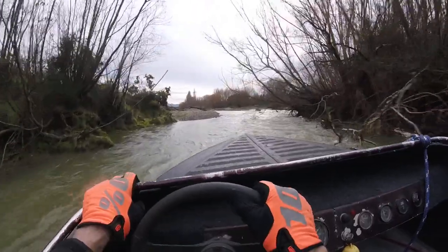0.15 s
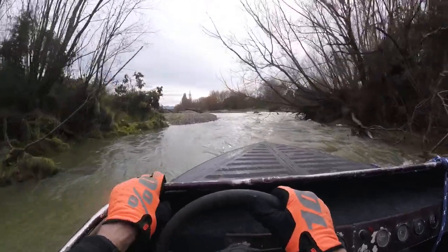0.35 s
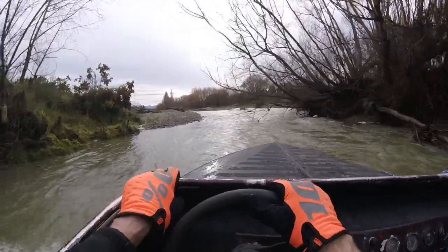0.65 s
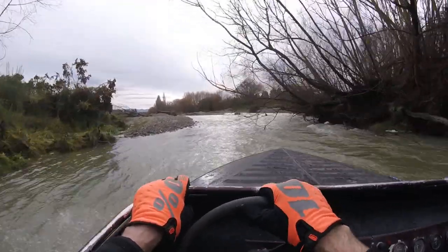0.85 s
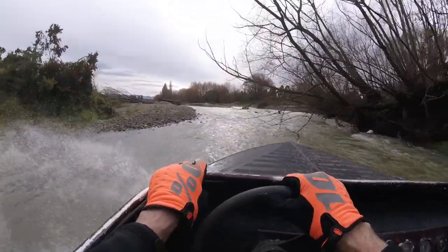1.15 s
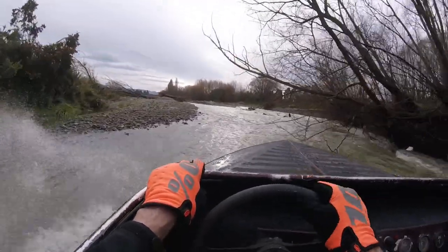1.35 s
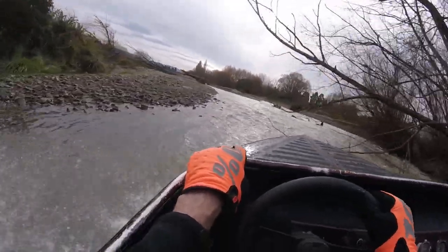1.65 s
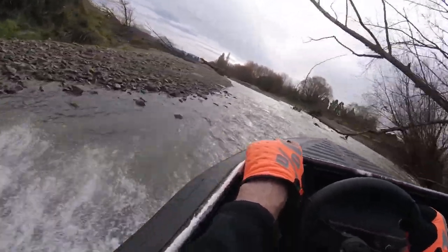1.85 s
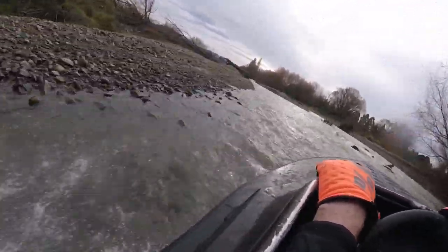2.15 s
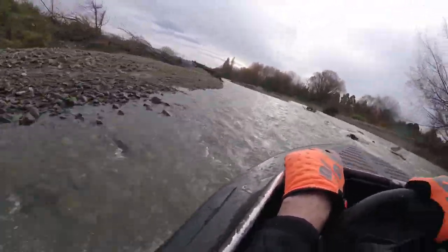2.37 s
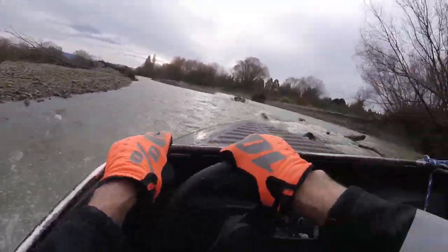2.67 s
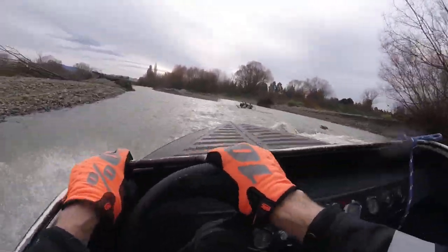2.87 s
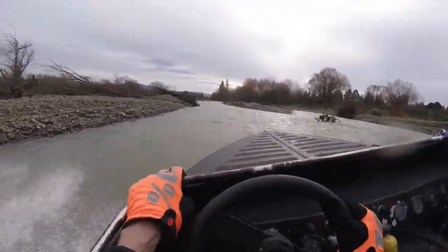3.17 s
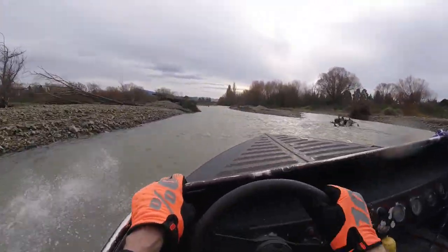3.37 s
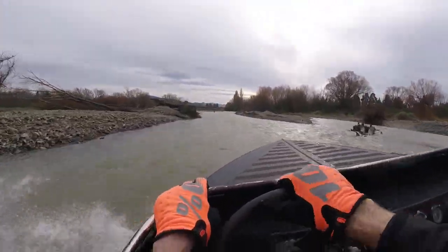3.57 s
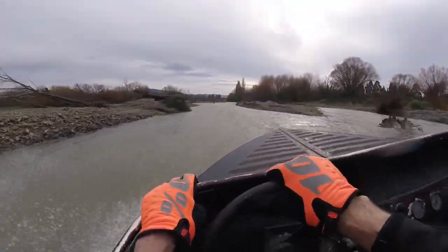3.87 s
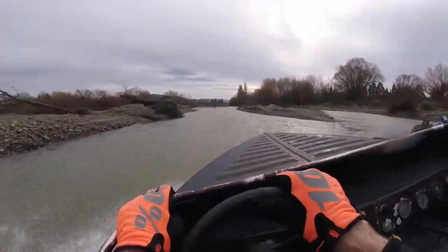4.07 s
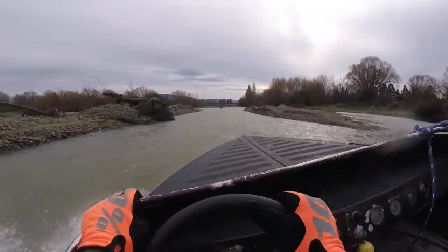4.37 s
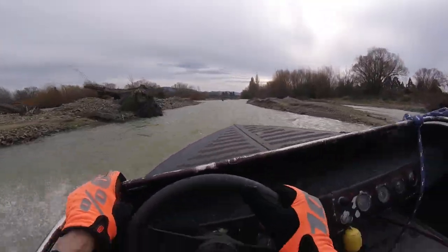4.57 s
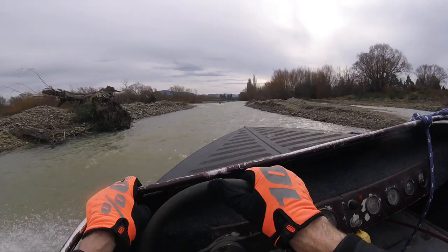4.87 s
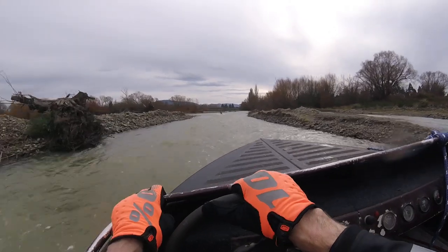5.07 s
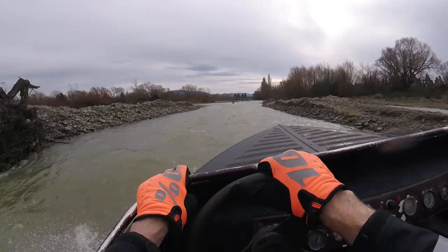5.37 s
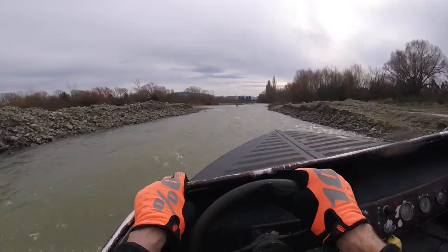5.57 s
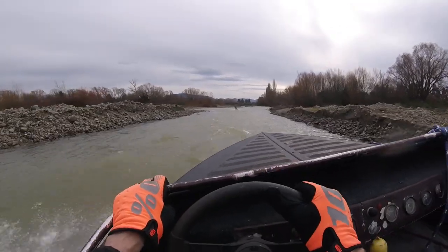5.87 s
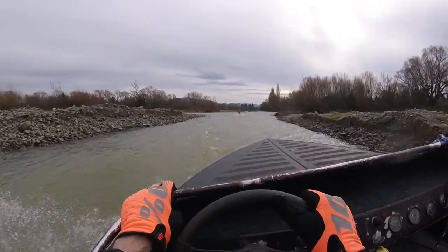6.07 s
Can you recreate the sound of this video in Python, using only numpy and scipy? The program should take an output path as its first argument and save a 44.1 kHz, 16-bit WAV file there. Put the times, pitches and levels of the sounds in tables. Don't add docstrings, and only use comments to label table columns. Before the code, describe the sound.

A helmet microphone in a sealed case, outdoors, about a metre above the deck. A steady high-revving engine growls and drones throughout, with faint valve clatter and high, narrow spray hiss. Early wave blows and a panel rattle give way to thin squeaks, then a splashy skid with a metallic stone knock around two seconds. Afterwards the drone continues over scattered dull thumps and more rattling.

```python
import sys
import numpy as np
from scipy import signal
from scipy.fft import rfft, irfft, next_fast_len
from scipy.io import wavfile
from scipy.ndimage import uniform_filter1d, map_coordinates

SR = 44100
rng = np.random.default_rng(int(sys.argv[2]) if len(sys.argv) > 2 else 0)


def dump_mix(stems):
    frames = np.atleast_2d(stems).T
    limited = np.clip(frames, -1, 1)
    pcm = np.round(limited * 32767).astype(np.int16)
    wavfile.write(sys.argv[1], SR, pcm)


def ratio_of_db(decibels):
    return 10 ** (np.asarray(decibels, float) / 20)


N = 274743

# (time [s], speed [Hz])
SHAFT_SPEED = [(0.0, 71.2), (0.07, 69.8), (0.35, 70.24), (0.62, 69.8), (1.2, 70.48), (1.34, 69.92),
               (2.24, 69.35), (2.29, 69.9), (2.65, 69.83), (2.9, 70.36), (3.54, 70.5), (3.7, 71.28),
               (6.11, 70.5), (6.23, 70.5)]
# (frequency [Hz], level [dB per Hz])
PORT_SPECTRUM = [(1500, -32), (2500, -23), (4100, -29), (6000, -12.5), (6500, 1), (7000, -11.5),
                 (7600, -29.5), (7850, -32), (8200, -29), (9100, -26.5), (9900, -34.5), (10400, -46.5),
                 (11000, -40.5), (12400, -57)]


def unit(x):
    return x / np.sqrt(np.mean(x ** 2) + 1e-20)


def curves(rows):
    s, *columns = np.transpose(rows)
    return [np.interp(np.arange(N) / SR, s, column) for column in columns]


def wobble(rate):
    coarse = np.arange(0, N + 64, 64)
    knots = rng.standard_normal(int(N * rate / SR) + 4)
    return np.interp(np.arange(N), coarse, map_coordinates(knots, [coarse * rate / SR]))


def bump(at, rise, fall):
    t = np.arange(N) / SR - at
    return np.exp(-.5 * (t / np.where(t < 0, rise, fall)) ** 2)


def skid():
    return bump(1.99, rise=0.33, fall=0.19)


def filtered(x, response):
    m = next_fast_len(N + SR // 2)
    return irfft(rfft(x, m) * response(np.fft.rfftfreq(m, 1 / SR)), m)[:N]


def colour(spectrum):
    hz, db = np.transpose(spectrum)
    return lambda f: ratio_of_db(np.interp(np.log(f + 1), np.log(hz + 1), db))


def resonances(modes):
    def response(f):
        total = 0
        for k, (centre, width, db) in enumerate(modes):
            damping = 1j * f * width
            total = total + (-1) ** k * ratio_of_db(db) * damping / (centre * centre - f * f + damping)
        return total
    return response


def rush(spectrum, patchy_db):
    z = signal.stft(rng.standard_normal(N), nperseg=512)[2]
    field = uniform_filter1d(rng.standard_normal(z.shape), 6, 0)
    field = uniform_filter1d(field, 10, 1)
    noise = signal.istft(z * ratio_of_db(patchy_db * unit(field)), nperseg=512)[1][:N]
    return unit(filtered(noise, colour(spectrum)))


def engine():
    # (time [s], heel into the bend [units], bow lift [units], engine load [dB])
    attitude = [(0, -0.6, .4, -2.5), (.25, -0.4, -0.26, 0), (.6, -.5, -1.3, -1.5), (.9, 0, -1.47, 0),
                (1.2, 0.9, -0.67, 0), (1.7, 1.12, 0.026, 1.5), (2.0, 1.53, 0.58, 3.5), (2.25, 2.1, 1.52, 0),
                (2.5, 2.16, 0.42, 0.5), (2.85, 0, -1.7, 1), (3.4, 0.5, 0.99, 0), (3.8, -.5, 0.68, 0),
                (4.2, -2, 1.11, -1), (4.5, -0.8, 1.53, 0), (5.0, -1.5, 0, 0), (5.3, -0.5, 0.18, 0),
                (5.6, -0.23, -0.97, 1.5), (6.23, 0.5, -0.47, -1)]
    # (multiple of the four-stroke cycle, level [dB], heel tilt [dB per unit], bow tilt [dB per unit])
    strong_orders = [(1, -7.5, -1.5, -1), (2, -2.5, -1.3, 0.4), (4, 2, -1.5, 0.1), (6, -7.5, -1.6, -.4),
                     (7, -2.5, -1.3, -.6), (8, 5, -0.1, -0.54), (10, -3.5, -1.4, 1.7), (12, -9, 2.3, -1),
                     (14, -1, -3, -2), (16, -11, -0.8, 3), (18.1, -6, 0.4, -0.1), (20, -5, 4.5, -.6),
                     (21, -17.5, -2, 1.5), (21.6, -10.5, -0.3, -3), (24, -12, -3, 1.4), (26, -19, 0.1, 1.1),
                     (28, -14, -1.7, .2), (30, -18.5, -2.5, 1.4), (32, -23.5, -4, -1.5),
                     (34, -20, -2, -1.1), (36, -19, -3, -3), (38, -23.5, 0, -0.5), (40, -24.5, -.9, 0),
                     (42, -21.5, -1.5, 1.2), (44, -30.5, 1, -1.2), (46, -21, .4, -.7)]
    # (frequency [Hz], level [dB per Hz])
    body_spectrum = [(47, -44.5), (80, -9.5), (145, -2), (189, -9.5), (275, -4), (388, -6.5), (505, -7.5),
                     (582, -14.5), (900, -23.5), (1170, -44), (1980, -120)]
    # (frequency [Hz], level [dB per Hz])
    clatter_spectrum = [(410, -28), (700, -3), (916, -7), (1080, -7), (1130, -9), (2180, -12.5),
                        (2480, -29.5), (3500, -22.5), (4550, -56.5), (7700, -120)]
    # (frequency [Hz], width [Hz])
    panel_mode = (520, 17)
    # (time [s], rise [dB])
    rattles = [
        (.2, 10),
        (.85, 3),
        (2.0, 3),
        (4.2, 9.5),
        (4.75, 4),
        (5.25, 6.5),
        (5.5, 4.5),
    ]
    cycle = np.pi * np.cumsum(curves(SHAFT_SPEED)[0]) / SR
    heel, lift, load_db = curves(attitude)

    strong = [round(k) for k, *_ in strong_orders]
    half_orders = [(k, -10.5 - .5 * k + 2.5 * rng.standard_normal(), -0.4, 0)
                   for k in range(1, 48, 2) if k not in strong]
    tones = np.zeros(N)
    for k, db, heel_db, lift_db in strong_orders + half_orders:
        level_db = db + load_db + heel_db * heel + lift_db * lift + .8 * wobble(3)
        scatter = .55 + k / 22 + round(k) % 2
        phase = round(k) * cycle + np.pi / 2 + scatter * rng.standard_normal() + .22 * wobble(9)
        tones += np.sqrt(2) * ratio_of_db(level_db + 1.6 * wobble(14)) * np.cos(phase)

    surge_db = 2.1 * bump(0, .25, .25)
    low_db = 9.5 - 2.5 * skid() + .3 * load_db
    upper_db = -5 + 1.7 * skid() - .4 * heel + surge_db
    panel_db = -8 + sum(db * bump(s, .09, .09) for s, db in rattles)
    beat = 1 + .3 * np.cos(2 * cycle) + .2 * np.cos(4 * cycle)
    low = ratio_of_db(low_db - 4.5 + 0.77 * wobble(12)) * rush(body_spectrum, patchy_db=-0.34)
    upper = ratio_of_db(upper_db - 2.0 + 0.63 * wobble(14)) * rush(clatter_spectrum, patchy_db=0.5)
    ring = resonances([(*panel_mode, 0)])
    panel = unit(filtered(rng.standard_normal(N), lambda f: ring(f) ** 2))
    return tones + unit(beat) * low + unit(np.sqrt(beat)) * upper + ratio_of_db(panel_db + 0.2) * panel


def valves():
    # (frequency [Hz], level [dB per Hz])
    valve_spectrum = [(1500, -37), (1750, 0.5), (2250, 3.5), (2600, -19), (4200, -12.5), (5000, -53)]
    turns = np.cumsum(curves(SHAFT_SPEED)[0]) / SR
    taps = np.exp(900 * (np.cos(2 * np.pi * turns) - 1))
    casing = rng.standard_normal(SR // 40)
    rattle = signal.fftconvolve(taps, casing)[:N]
    return ratio_of_db(-18.5 + .7 * wobble(4)) * unit(filtered(rattle, colour(valve_spectrum)))


def spray():
    # (time [s], rise [dB])
    splashes = [
        (1.7, 1.5),
        (1.85, 4.5),
        (2.01, 3),
        (2.12, 6.5),
        (5.68, 1.5),
        (5.78, 2),
    ]
    splash_s = 0.019
    splash_db = sum(db * bump(s, splash_s / 2, splash_s) for s, db in splashes)
    level_db = 3 * skid() + splash_db + 0.63 * wobble(70)
    return ratio_of_db(level_db) * rush(PORT_SPECTRUM, patchy_db=0.5)


def waves():
    # (time [s], peak level [dB], pitch [Hz])
    thumps = [(.049, 18, 62), (0.141, 14, 62), (.27, 27, 58.7), (.323, 18, 57), (.424, 20, 54.4),
              (.499, 23, 46), (0.855, 19, 67), (1.22, 20, 77), (2.474, 18.5, 62), (2.737, 19, 62.07),
              (2.815, 20, 54), (2.96, 23, 54.02), (3.203, 18, 48), (3.596, 14, 46), (3.856, 12, 48),
              (3.967, 12, 73), (4.248, 10, 70), (4.348, 18, 51), (4.444, 7, 65), (4.587, 24.5, 57.23),
              (4.665, 13, 65.4), (4.827, 16, 59.17), (5.019, 16.5, 59.04), (5.22, 13, 73.05),
              (5.261, 15, 67.04), (5.441, 15, 54), (5.899, 22.5, 59.23), (6.008, 12, 54)]
    # (frequency [Hz], level [dB per Hz])
    chop_spectrum = [(10, -32), (25, -10), (45, 5), (70, -2.5), (110, -14.5), (250, -56.5)]
    out = np.zeros(N + SR)
    t = np.arange(-SR // 16, SR // 16) / SR
    hill = np.exp(-.5 * (t / 0.0095) ** 2)
    for s, db, hz in thumps:
        out[round(s * SR):][:len(t)] += ratio_of_db(db - 2.0) * hill * np.sin(-2 * np.pi * hz * t)
    calm_db = -7.5 * bump(3.95, .2, .2)
    chop_db = 1 - 10 * skid() + calm_db
    chop = ratio_of_db(chop_db - 3.0 + 2.2 * wobble(13)) * rush(chop_spectrum, patchy_db=1.2)
    return out[SR // 16:][:N] + chop


def squeaks():
    # (time [s], length [s], pitch [Hz], level [dB])
    rubs = [
        (0.45, .045, 3520, -11.5),
        (.95, 0.45, 1620, -10),
        (1.2, 0.5, 3370, -19),
        (1.661, 0.26, 3384, -31.5),
    ]
    t = np.arange(N) / SR
    out = np.zeros(N)
    for s, length, hz, db in rubs:
        swell = np.sin(np.pi * np.clip((t - s) / length, 0, 1))
        out += ratio_of_db(db) * swell * np.sin(2 * np.pi * hz * t + 0.46 * wobble(38.8))
    return out


def stone():
    # (time [s], blow [dB], 60 dB decay [s], tick in the port [dB], low body [dB])
    knocks = [
        (2.089, 28, 0.095, 15.5, 22.5),
        (2.1491, -6, .03, 13.5, -2),
        (2.2159, -4, .05, -12, 19.5),
        (2.2236, -3, .06, 12, 18.5),
    ]
    # (frequency [Hz], width [Hz], level [dB])
    hull_modes = [(397.5, 160, -4), (801, 85, -9), (1100, 44, -7.5), (1300, 59, 4), (1610, 84, 3.5),
                  (2110, 91, 1.5), (2850, 140, -6), (3350, 120, -8), (3750, 200, -11)]
    # (time [s], level [dB], frequency [Hz], 60 dB decay [s])
    flexes = [
        (2.101, -10, 96, 0.097),
        (2.104, -12.5, 183, 0.085),
    ]
    dull, bright, body, flex = np.zeros((4, N))
    t = np.arange(SR // 5) / SR
    for s, db, t60, tick_db, body_db in knocks:
        noise = rng.standard_normal((3, len(t)))
        i = round(s * SR)
        blow = -6 * np.exp(-t / 0.00035)
        dull[i:i + len(t)] += ratio_of_db(db) * (ratio_of_db(-60 * t / t60) * noise[0] + blow)
        bright[i:i + len(t)] += ratio_of_db(tick_db + 19.5 - 60 * t / 0.039) * noise[1]
        body[i:i + len(t)] += ratio_of_db(body_db + 15 - 60 * t / 0.2) * noise[2]
    for s, db, hz, t60 in flexes:
        envelope = ratio_of_db(db + 44 - 60 * t / t60) * (1 - np.exp(-t / 0.01))
        flex[round(s * SR):][:len(t)] += envelope * np.sin(2 * np.pi * hz * t)
    hull, low_body = resonances(hull_modes), resonances([(400, 380, 0)])
    plates = filtered(dull, lambda f: hull(f) / (1 + 1j * f / 3500) ** 2)
    thud = filtered(body, lambda f: low_body(f) ** 2)
    tick = filtered(bright, colour(PORT_SPECTRUM))
    return plates + thud + tick + flex


def scene():
    return (engine() + valves() + spray() + waves() + squeaks() + stone())[None]


def gain_control():
    # (time [s], depth [dB], release [s])
    ducks = [
        (.21, 4.5, 1.2),
        (2.034, 7, 0.76),
        (2.034, 2.5, 0.021),
        (3.1, 0.5, 0.43),
        (4.515, 2, 0.83),
        (5.8, 2, 1.3),
    ]
    t = np.arange(N) / SR
    gain_db = np.full(N, -29.5)
    for s, depth_db, release in ducks:
        fall = np.clip((t - s) / 0.0076 + .5, 0, 1)
        gain_db -= depth_db * fall * np.exp(-np.abs(t - s) / release)
    return ratio_of_db(gain_db)


def starve(x):
    # (low edge [Hz], high edge [Hz], share of time empty, changes [per s])
    notch_bands = [(7580, 7750, .6, 9), (7750, 8050, .87, 7), (8050, 8250, .15, 14), (8250, 8450, .08, 20),
                   (9750, 10050, .15, 20)]
    top_bands = [(hz, hz + 172, .62 if hz < 11900 else .92, 30) for hz in range(10050, 12400, 172)]
    hz, t, z = signal.stft(x, SR, nperseg=1024)
    for lo, hi, share, rate in notch_bands + top_bands:
        chance = wobble(rate)[np.minimum(t * SR, N - 1).astype(int)]
        z[:, (hz >= lo) & (hz < hi)] *= chance > np.quantile(chance, share)
    return signal.istft(z, SR, nperseg=1024)[1][:, :N]


def top_cut(x):
    return signal.sosfilt(signal.butter(12, 12400, fs=SR, output="sos"), x)


def record(dry):
    mix = starve(dry * gain_control())
    return top_cut(mix)


dry = scene()
out = record(dry)
dump_mix(out)
```